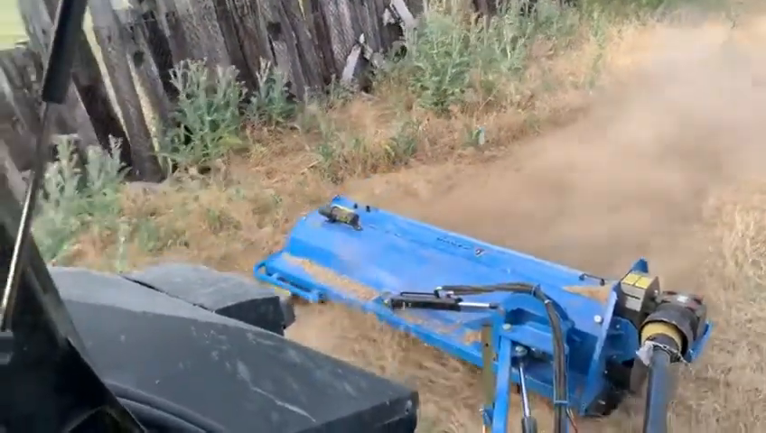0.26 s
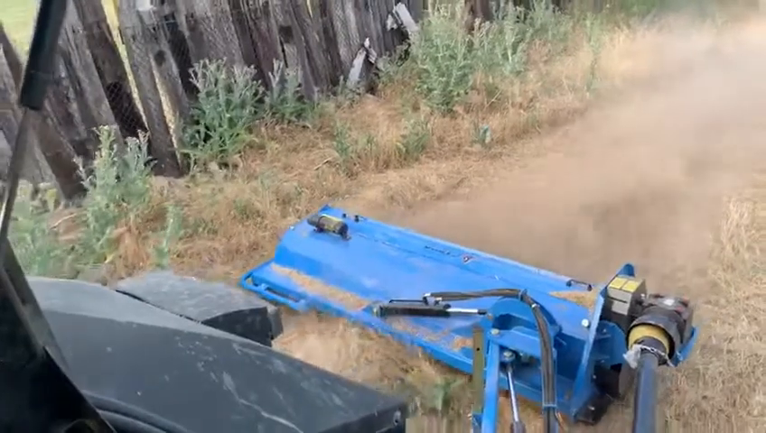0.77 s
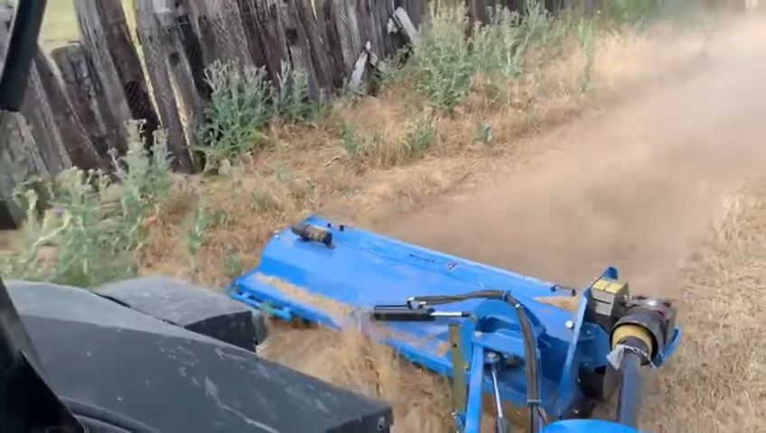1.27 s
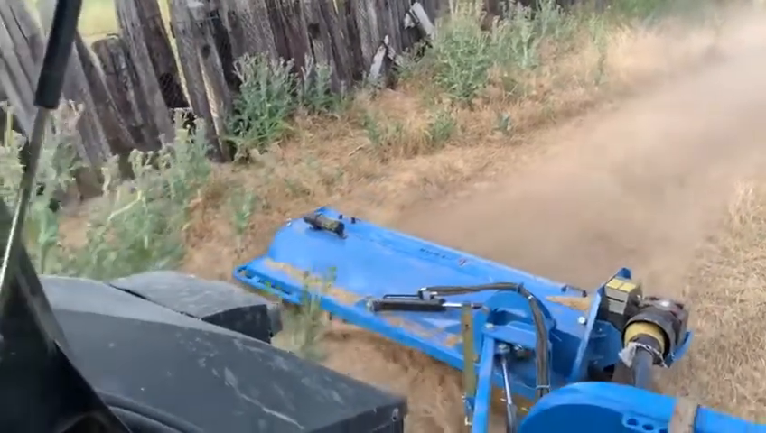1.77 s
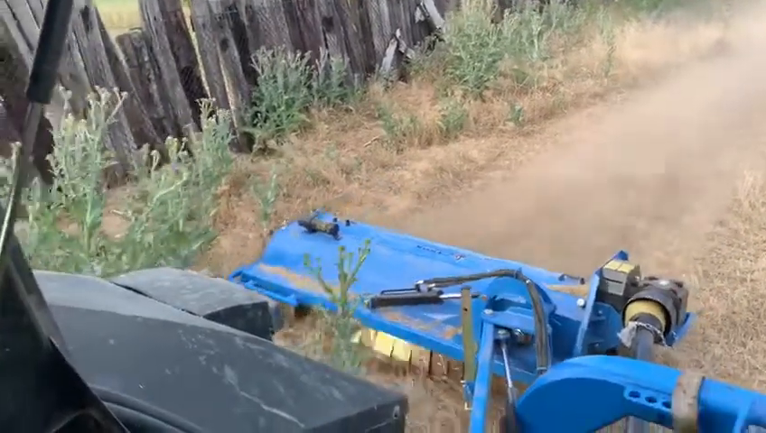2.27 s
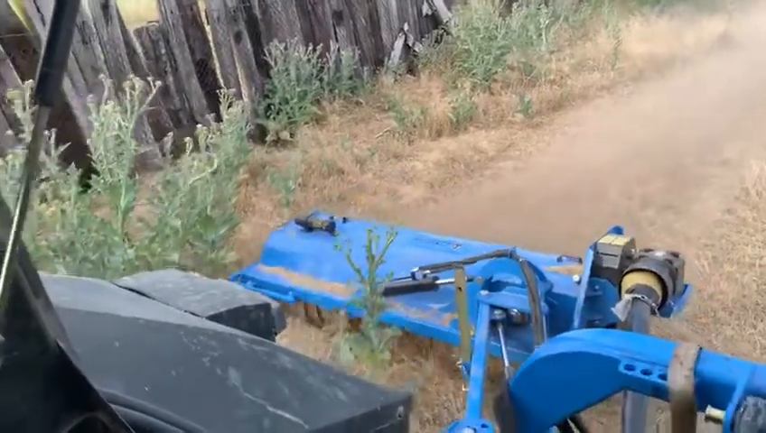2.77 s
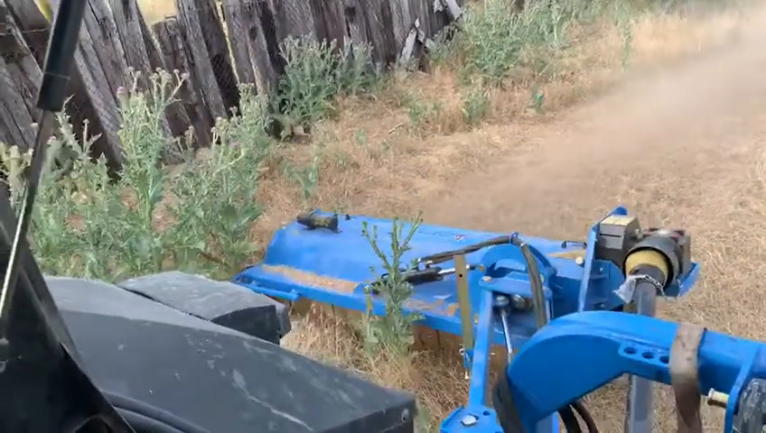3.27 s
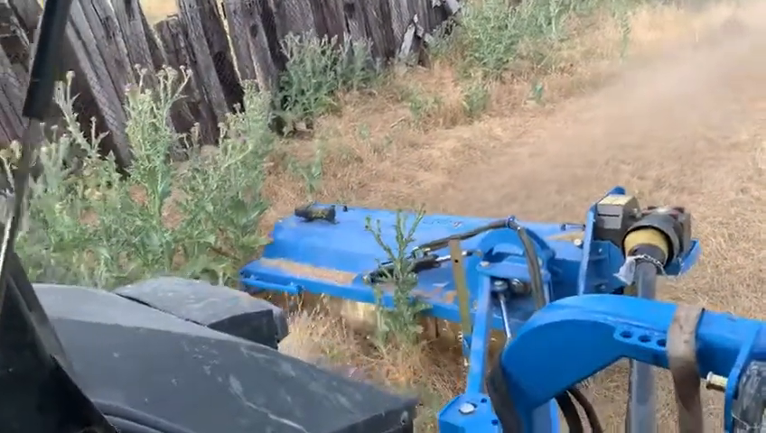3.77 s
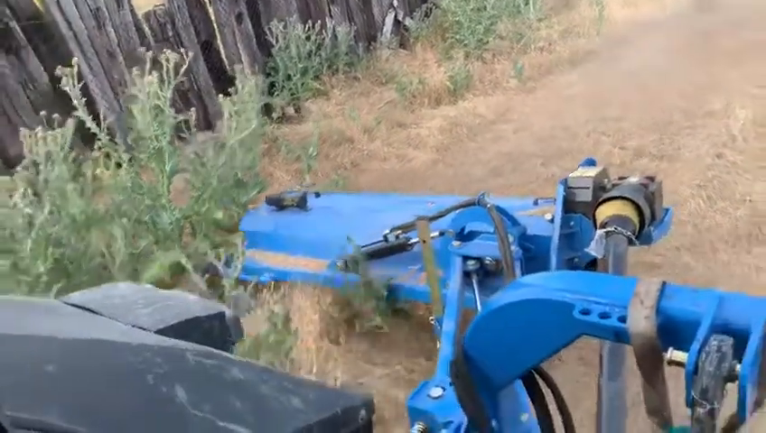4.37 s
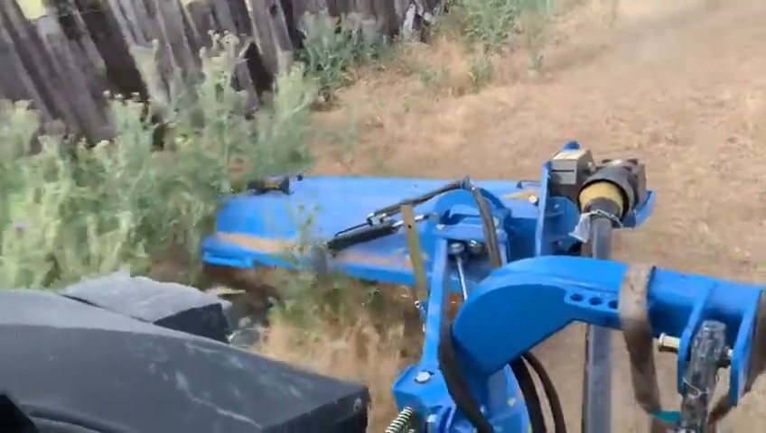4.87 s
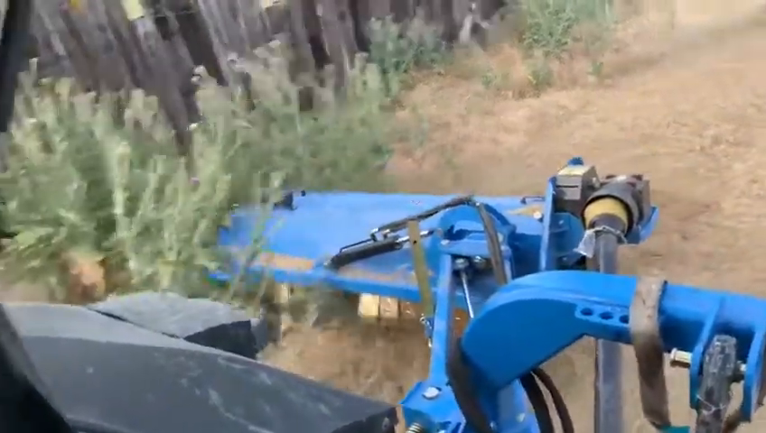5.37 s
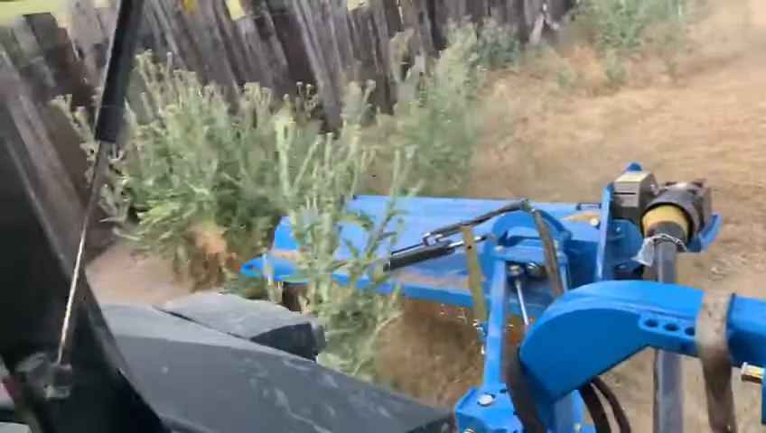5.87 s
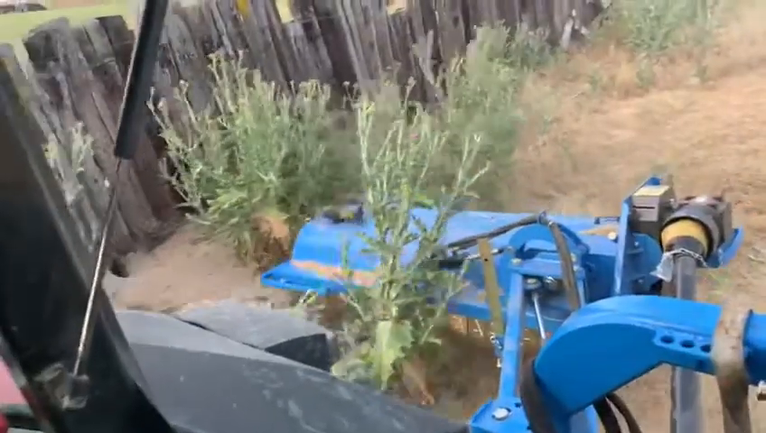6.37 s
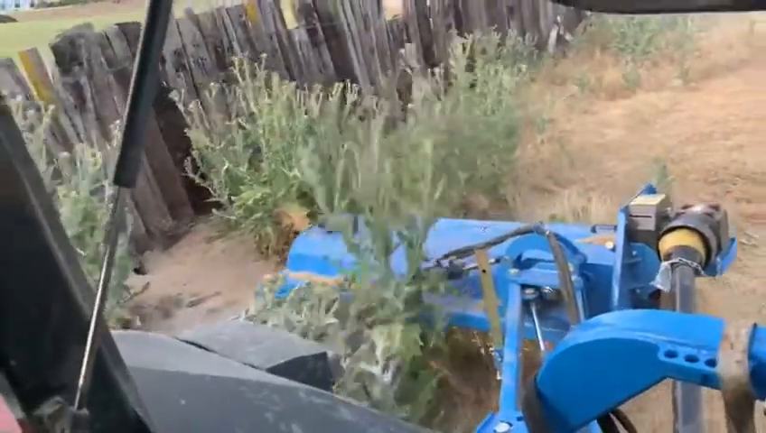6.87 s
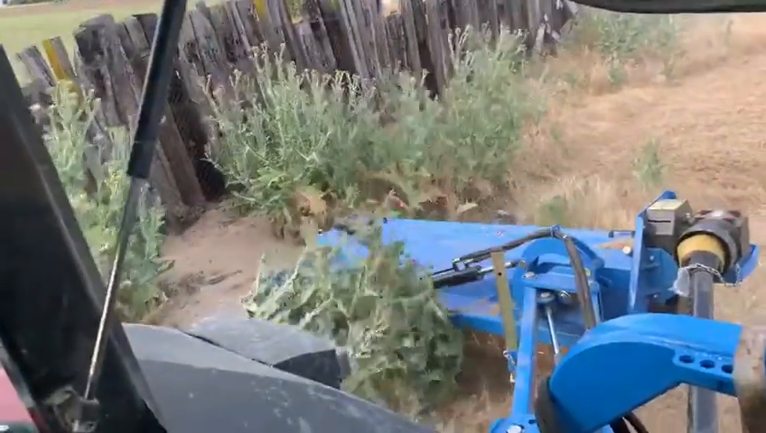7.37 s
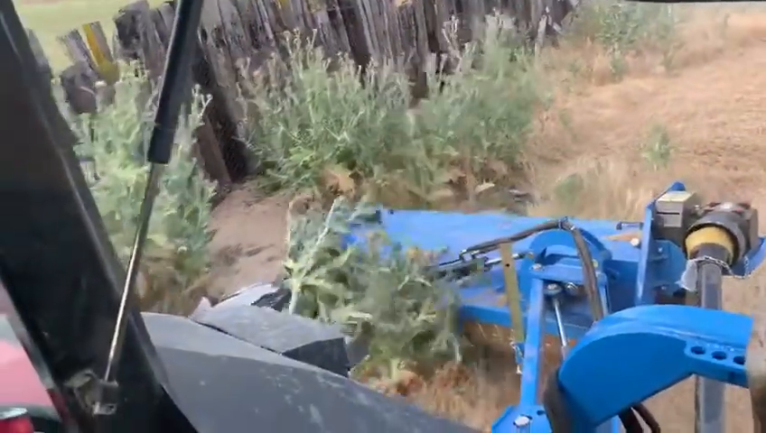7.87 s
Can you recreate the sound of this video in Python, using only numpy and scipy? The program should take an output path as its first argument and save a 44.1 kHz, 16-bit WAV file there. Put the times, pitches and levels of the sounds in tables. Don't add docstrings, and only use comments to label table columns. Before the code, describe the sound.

Close at an open tractor cab, a throbbing engine drones under shifting hydraulic whine as dry stalks crackle, snap and finally burst into dense shredding.

```python
import sys
import numpy as np
from scipy import signal
from scipy.fft import rfft, irfft, next_fast_len
from scipy.io import wavfile
from scipy.ndimage import uniform_filter1d

SR = 44100
rng = np.random.default_rng(int(sys.argv[2]) if len(sys.argv) > 2 else 0)


def boost_factor(decibels):
    exponent = np.asarray(decibels, float) / 20
    return 10 ** exponent


def log_audio(samples):
    frames = np.atleast_2d(samples).T
    limited = np.clip(frames, -1, 1)
    pcm = np.round(limited * 32767).astype(np.int16)
    wavfile.write(sys.argv[1], SR, pcm)


N = 357643
TIME = np.arange(N) / SR
STEP = 32
SIZE = next_fast_len(N)
HZ = np.arange(SIZE // 2 + 1) * SR / SIZE + 1e-3

CYCLE_HZ, ROTOR_HZ, PUMP_HZ = 12.875, 36.27, 327.1
LAG_S = 0.00016

# time_s, speed [share of working speed]
SHAFT_SPEED = [(0, 1.001), (.6, 1.001), (1.1, .998), (1.7, 1.0037), (2.3, 1.0022), (3.2, 1.005),
               (3.65, 1.003), (3.87, .987), (4.1, .9777), (4.35, .972), (4.7, .989), (5.0, 1.0006),
               (5.9, .9986), (6.5, .9945), (7.1, .9963), (8.11, .996)]


def columns(table):
    s, *cols = np.transpose(table)
    return [np.interp(TIME, s, c) for c in cols]


def shape(points, hz=HZ):
    f, db = np.transpose(points)
    return np.interp(np.log(hz), np.log(f), db)


def unit(x):
    return x / np.sqrt(np.mean(x ** 2))


def walk(rate):
    count = len(TIME[::STEP])
    hold = int(SR / STEP / rate)
    held = np.repeat(rng.standard_normal(count // hold + 1), hold)
    slewed = uniform_filter1d(uniform_filter1d(held, hold), hold)
    return unit(slewed[:count])


def fine(slow):
    return np.interp(TIME, TIME[::STEP], slow).astype(np.float32)


def loaded(idle_db, gain_db):
    # time_s, load [share of full load]
    effort = [(0, 0.26), (.8, 0.16), (1.2, 0.082), (2.2, 0.0073), (2.65, 0.54), (3.0, 0.43), (3.4, 0.61),
              (3.8, 0.72), (4.1, 0.89), (4.6, 1.02), (5.2, 0.83), (5.45, 0.63), (5.8, 0.77), (6.4, 0.78),
              (7.0, 0.66), (7.93, 0.85), (7.97, 1.36), (8.11, 1.43)]
    return idle_db + gain_db * columns(effort)[0]


def swells(rows, rest_db, rise_share=1):
    t = TIME[::STEP]
    power = boost_factor(np.broadcast_to(rest_db, N)[::STEP]) ** 2
    for s, wide_s, db in rows:
        width_s = np.where(t < s, rise_share * wide_s, wide_s)
        power = power + boost_factor(db - 6 * ((t - s) / width_s) ** 2) ** 2
    return fine(10 * np.log10(power))


def ports(mid, other, lag_s):
    # pitch_hz, level_db
    side_db = [(60, -60), (110, -26), (200, -13.5), (350, -16), (630, 0.5), (1140, 0.5), (2060, 1.5),
               (3710, 1), (6700, 0), (12100, 0)]
    # pitch_hz, level_db
    lean_db = [(60, 2), (110, 2), (200, -3), (350, 1.5), (630, -4), (1140, 2.5), (2060, 0.7), (3710, -1),
               (6700, -2), (12100, -3)]
    late = 0.36 * np.sin(2 * np.pi * HZ * lag_s)
    tied = np.tanh(shape(lean_db) / 6) - 1j * late
    tied = tied / np.maximum(1, np.abs(tied))
    untied = np.sqrt(np.maximum(0, 1 - np.abs(tied) ** 2))
    return np.array([mid, boost_factor(shape(side_db)) * (tied * mid + untied * other)])


def bands(pair, edges_hz, gains_db, flicker_db, flicker_rate):
    out, octave = np.zeros((2, N), np.float32), np.log2(HZ)
    for lo, hz, hi, db in zip(edges_hz, edges_hz[1:], edges_hz[2:], gains_db):
        window = np.interp(octave, np.log2([lo, hz, hi]), [0, 1, 0])
        gain = fine(boost_factor(db[::STEP] + flicker_db * walk(flicker_rate)))
        out += gain * irfft((pair * window).astype(np.complex64), SIZE)[:, :N]
    return np.array([out[0] + out[1], out[0] - out[1]])


def tones(turns, orders, levels_db, wobble_db, wander, lag_s, lean_db, locked=False):
    out, hz = np.zeros((2, N), np.float32), turns[-1] / TIME[-1]
    for k, db in zip(orders, levels_db):
        start = rng.random()
        cycles = k * turns + fine((.75 if locked else start) + wander * walk(9))
        phase = (cycles - np.floor(cycles)).astype(np.float32) * float(2 * np.pi)
        lag = float(np.pi * k * hz * lag_s)
        lean = lean_db * min(1., k * hz / 1000) ** 2 / 2
        gain = fine(np.sqrt(2) * boost_factor(np.broadcast_to(db, N)[::STEP] + wobble_db * walk(7)))
        out[0] += gain * float(boost_factor(lean)) * np.sin(phase - lag)
        out[1] += gain * float(boost_factor(-lean)) * np.sin(phase + lag)
    return out


def ring(s, hz, db, t60):
    out, first = np.zeros(N), int(s * SR) + 1
    t = TIME[first:first + SR // 4] - s
    out[first:first + len(t)] = boost_factor(db - 60 * t / t60) * (np.sin(2 * np.pi * hz * t) if hz else 1)
    return out


def roar(turns):
    # pitch_hz, level_db [per Hz]
    roar_db = [(15, -32), (25, -17), (75, -3.5), (143, -2.5), (195, -13), (306, -4), (482, -12.5),
               (543, -14.5), (612, -16.5), (1010, -17.5), (1310, -20.5), (1970, -20.5), (3100, -32),
               (3750, -34.5), (7500, -45), (9750, -74), (16500, -120)]
    cycle = 2 * np.pi * CYCLE_HZ * turns
    push = 1 + 0.077 * np.cos(cycle) + 0.1 * np.cos(2 * cycle)
    push += 0.051 * np.cos(4 * cycle) + 0.016 * np.cos(6 * cycle)
    noise = rfft(push * rng.standard_normal((2, N)), SIZE) * boost_factor(shape(roar_db[:-2]))
    edges_hz = 20 * 2 ** np.arange(0, 9.6, .5)
    rumble = loaded(-31, 0.47)
    drum = loaded(-35.5, 5.8)
    clatter = loaded(-31, 4)
    gains = [rumble if hz < 170 else drum if hz < 480 else clatter for hz in edges_hz[1:]]
    scale = np.std(irfft(noise[0] * (HZ > 480), SIZE))
    return bands(ports(*noise, LAG_S), edges_hz, gains, flicker_db=1.4, flicker_rate=10) / scale


def gear_mesh(turns):
    mesh_hz = (542, 1061.8, 1098.2, 1134, 1238.8, 790.2, 921, 1035.2, 1204, 1600, 2417)
    # peak_s, width_s [6 dB down], level_db
    mesh_swells = [
        [(1.0, 0.91, -38.5), (2.9, 0.74, -39), (5.8, 0.4, -42), (6.6, 0.43, -44), (8.1, 0.26, -38)],
        [(.8, 0.64, -40), (3.0, .5, -44.5), (5.0, 0.31, -37), (5.8, 0.56, -39), (7.05, 0.18, -33)],
        [(3.3, .4, -43), (4.3, 0.36, -40), (5.8, 0.8, -37), (7.1, 0.4, -37), (7.9, .3, -38)],
        [(.9, .9, -40.5), (2.3, 0.4, -38), (3.8, 0.2, -43.5), (5.9, .5, -45)],
        [(2.3, .3, -42), (4.6, 0.54, -40), (5.9, 0.41, -38.5), (7.4, 0.43, -38)],
        [(1.2, 0.67, -44), (4.8, 0.74, -41.5), (7.1, 0.79, -41.5)],
        [(3.5, 0.82, -45), (6.4, 0.41, -41), (7.7, 0.51, -38.5)],
        [(2.6, 0.91, -44), (5.0, 0.26, -47), (6.0, 0.47, -37.5), (7.9, 0.56, -35.5)],
        [(2.9, .5, -41), (4.9, 0.89, -40.5), (6.3, 0.37, -38.5)],
        [(2.2, .8, -61), (3.4, .3, -43)],
        [(2.3, 0.34, -46.5), (4.6, .2, -52), (7.8, 0.37, -52)],
    ]
    mesh_rest_db = (-44.5, -53, -59, -49, -47, -50, -45.5, -52.5, -51.5, -51, -76)
    # pitch_hz, level_db
    sidebands = [(530.8, -49), (599.5, -52.5), (953.8, -45.5), (1008.5, -46), (1025.8, -46), (1129, -46.5),
                 (1275, -53.5), (1945, -44.5)]
    levels = map(swells, mesh_swells, mesh_rest_db)
    gears = tones(turns, mesh_hz, levels, wobble_db=1.8, wander=.04, lag_s=0, lean_db=3.5)
    gears += tones(turns, *np.transpose(sidebands), wobble_db=4.1, wander=.05, lag_s=.00006, lean_db=1.0)
    return gears


def pump_song(turns):
    piston_orders = (1, 2, 3, 6, 5)
    # peak_s, width_s [6 dB down], level_db
    piston_swells = [
        [(0, 0.41, -38), (1.35, 0.26, -30), (3.1, 0.6, -35.5), (4.9, 0.49, -34), (6.65, 0.25, -28.5)],
        [(.3, 1, -43), (4.4, 0.9, -37.5), (5.6, .6, -36), (6.8, 0.57, -33), (7.7, .6, -43)],
        [(.1, 0.47, -30.5), (.75, 0.38, -31), (1.3, 0.22, -31.5), (1.9, 0.06, -40), (2.6, .3, -41),
         (6.6, .6, -44), (7.8, .71, -41)],
        [(1.1, .62, -35), (3.0, .35, -50), (4.3, 0.93, -37.5), (5.8, 0.36, -41.5), (7.2, .5, -35),
         (8.1, .35, -41)],
        [(.3, .6, -42), (1.6, .6, -43), (2.8, .6, -43), (5.3, .8, -41), (6.6, .2, -45), (7.4, .2, -37),
         (7.98, .15, -30.5)],
    ]
    piston_rest_db = (-42.5, -48, -50, -47, -48)
    # peak_s, width_s [6 dB down], level_db
    whistles = [
        [(2.85, .15, -53), (3.46, .06, -43), (3.56, .05, -43.5), (3.65, .04, -49)],
        [(2.73, .05, -52)],
    ]
    # order [multiple of pump pitch], level_db
    weak = [(4, -54), (7, -56), (8, -59), (9, -57), (10, -62), (11, -64), (12, -68)]
    shaft = PUMP_HZ * turns
    levels = map(swells, piston_swells, piston_rest_db)
    pump = tones(shaft, piston_orders, levels, wobble_db=1.3, wander=.04, lag_s=.00024, lean_db=1.5)
    levels = map(swells, whistles, (-57, -73))
    pump += tones(shaft, (13.98, 13.7), levels, wobble_db=2, wander=.05, lag_s=LAG_S, lean_db=0)
    pump += tones(shaft, *np.transpose(weak), wobble_db=2.5, wander=0.05, lag_s=LAG_S, lean_db=0)
    return pump


def engine_firing(turns):
    # order [multiple of engine cycle], level_db
    weak = [(5, -62), (8, -41), (9, -38.5), (10, -45), (12, -36.5), (15, -40.5), (18, -39), (20, -41.5),
            (23, -48), (27.5, -45.5), (29.5, -40.5), (35, -55.5), (55, -50)]
    shaft = CYCLE_HZ * turns
    second = loaded(-31.5, 2.5)
    speed_lost_percent = 100 * (1 - columns(SHAFT_SPEED)[0])
    third = loaded(-31, 4.9) + 1.5 * speed_lost_percent
    engine = tones(shaft, (4, 6), (second, third), wobble_db=.8, wander=.02, lag_s=.00028, lean_db=0,
                   locked=True)
    engine += tones(shaft, *np.transpose(weak), wobble_db=1.9, wander=0.059, lag_s=0.00018, lean_db=0,
                    locked=True)
    return engine


def rotor_hum(turns):
    row_orders = (4, 8, 40, 49.68, 12, 39)
    # peak_s, width_s [6 dB down], level_db
    row_swells = [
        [(.4, 1.0, -23), (2.0, 0.25, -29), (3.15, 0.6, -35), (4.6, 0, -36), (7.7, 1.5, -36.5)],
        [(.5, 0.84, -31.5), (3.4, 0.5, -27.5), (4.3, 0.75, -29.5), (6.7, 0.15, -36), (7.6, -1.5, -37)],
        [(1.5, 0.3, -37), (2.1, 0.5, -43), (2.65, 0.46, -35.5), (3.4, 1.5, -43)],
        [(2.25, 0.3, -34.5), (3.45, 0.5, -37.5)],
        [(4.3, 0.3, -35.5), (5.4, 0.4, -37), (6.0, 1.1, -41), (7.6, 1, -38.5)],
        [(1.25, -0.2, -36), (2.6, 3, -45.5)],
    ]
    row_rest_db = (-38, -40, -50, -58, -50, -53)
    # order [multiple of rotor turn], level_db
    weak = [(1, -52), (2, -43.5), (3, -34), (6, -42), (7, -48.5), (41, -44.5), (43, -43.5)]
    shaft = ROTOR_HZ * turns
    levels = map(swells, row_swells, row_rest_db)
    rotor = tones(shaft, row_orders, levels, wobble_db=1.66, wander=0.024, lag_s=0.00012, lean_db=0)
    rotor += tones(shaft, *np.transpose(weak), wobble_db=1.9, wander=0.06, lag_s=0.00019, lean_db=0)
    return rotor


def snaps():
    # start_s, peak_db, pitch_hz, t60_s
    snap_events = [(1.1323, -23.5, 6040, 0.036), (1.1424, -33, 3500, 0.03), (1.1564, -27, 5900, 0.021),
                   (1.21, -24, 6040, 0.034), (1.2194, -24, 5880, 0.017), (4.372, -28, 2890, .025),
                   (4.4732, -23.5, 2880, .025), (4.8029, -31, 2650, .025), (5.657, -22, 1930, .03),
                   (5.723, -20.5, 5250, 0.022), (4.6573, -26, 2940, 0.027), (4.84, -22, 1930, .025),
                   (4.9257, -28.5, 3670, .025), (5.1507, -28, 3850, 0.032), (5.3662, -30, 2570, .02),
                   (5.3916, -16.5, 2520, 0.043), (5.461, -19, 2870, 0.047), (5.469, -20, 3600, .04),
                   (5.61, -22, 3280, 0.032), (5.7698, -26, 3820, .025), (5.94, -14, 3330, 0.054),
                   (5.9415, -20, 4500, .03), (6.1481, -27, 1640, .03), (6.8386, -32, 1950, 0.032),
                   (7.5968, -25, 1620, 0.028), (7.928, -26, 1970, .03), (6.0601, -26, 3000, 0.033),
                   (6.4103, -20, 3520, 0.031), (6.4994, -27, 3220, 0.03), (6.7306, -31.5, 3270, 0.03),
                   (7.4744, -31, 2890, 0.027), (7.9558, -15.5, 1610, 0.06), (8.002, -15, 4100, .03)]
    rings, puffs = np.zeros(N), np.zeros(N)
    splinter_band = signal.butter(2, [1800, 5500], "bandpass", fs=SR, output="sos")
    splinters = signal.sosfilt(splinter_band, rng.standard_normal((2, N)))
    for s, db, hz, t60 in snap_events:
        chink = hz > 5000
        rings += ring(s, hz, db - (4 if chink else 6), (1.8 if chink else 1) * t60)
        puffs += ring(s, 0, db - (14 if chink else -2.5), 0.61 * t60)
    return rings + puffs * splinters


def stone_on_hood():
    # pitch_hz, level_db, t60_s
    hood_modes = [(135, -7, .12), (225, -13, .04), (266, -.5, .13), (335, -8, .04), (390, -7, .07),
                  (550, -5, .08), (680, -.5, .022), (1100, -2.5, .016), (1900, -12, .012),
                  (2800, -13, .012)]
    rings = np.zeros(N)
    for hz, db, t60 in hood_modes:
        arrives_s = 6.4125 + .0009 * np.sqrt(1000 / hz)
        sign = -1 if 200 < hz < 450 else 1
        rings += sign * ring(arrives_s, hz, db - 7.5, t60)
    return rings


def shredding(turns):
    # pitch_hz, level_db [per Hz]
    stalk_db = [(500, -4), (1000, 5.5), (1700, 3), (2500, -1.5), (3500, -3.5), (5000, -6), (7500, -6)]
    # time_s, level_db
    feed = [(0, -36), (.5, -38.5), (1.25, -39), (2.5, -40), (3.3, -43.5), (4.3, -45.5), (4.5, -42),
            (5.3, -39.5), (5.7, -34), (6.15, -39.5), (7.0, -38.5), (7.55, -43), (7.85, -39.5), (8.11, -30)]
    # peak_s, width_s [6 dB down], level_db
    clumps = [(1.18, 0.56, -39), (4.7, 0.1, -40), (4.845, .03, -40.5), (4.97, -0.05, -35),
              (5.025, .05, -31.5), (5.1, -0.05, -34.5), (5.15, -0.04, -30), (5.395, -0.03, -30),
              (5.43, 0.14, -35.5), (5.468, 0.07, -32.5), (5.56, 0.2, -44), (5.61, 0.05, -33),
              (5.7, .04, -36.5), (5.77, 0.03, -34), (5.942, 0.03, -34), (6.06, .03, -36.5),
              (6.345, 0.3, -49), (6.412, -0.02, -32), (6.5, 0.02, -35), (6.68, .1, -42), (6.84, .03, -41),
              (6.97, 0, -41), (7.195, .1, -44), (7.36, 0.05, -36), (7.65, 0.15, -41), (7.93, -0.05, -38),
              (7.965, 0.03, -28.5), (8.005, -0.02, -25.5), (8.045, 0, -29), (8.09, 0.02, -31.5)]
    rows = 1 + .03 * np.cos(2 * np.pi * ROTOR_HZ * turns)
    cracks = (rng.random(N) < 2500 / SR) * boost_factor(2.0 * rng.exponential(size=N))
    crackle = 1 + .4 * unit(uniform_filter1d(cracks, 30))
    grit = rows * fine(boost_factor(1.1 * walk(35))) * crackle
    noise = rfft(grit * rng.standard_normal((2, N)), SIZE) * boost_factor(shape(stalk_db))
    edges_hz = 300 * 2 ** np.arange(0, 6.1, .4)
    scale = np.std(irfft(noise[0] * (HZ > 3000) * (HZ < 7500), SIZE))
    gust_db = swells(clumps, columns(feed)[0], rise_share=0.37) - 1.5
    pair = ports(*noise, lag_s=0.0003)
    return bands(pair, edges_hz, [gust_db] * len(edges_hz), flicker_db=1.34, flicker_rate=24) / scale


def scene():
    turns = np.cumsum(columns(SHAFT_SPEED)[0]) / SR
    driveline = gear_mesh(turns) + pump_song(turns) + engine_firing(turns) + rotor_hum(turns)
    return roar(turns) + driveline + snaps() + stone_on_hood() + shredding(turns)


def valleys(dips):
    return sum(db * np.exp(-((HZ - hz) / wide) ** 2) for hz, wide, db in dips)


def patches(frames, lines, tall, wide):
    tiles = rng.standard_normal((2, frames // tall + 1, lines // wide))
    return np.kron(tiles, np.ones((1, tall, wide)))[:, :frames]


def thin(pair, patchy_db=4.5, mottle_db=5):
    # pitch_hz, level_db
    step_db = [(200, -22), (500, -16), (1000, -10), (2200, -3.5), (3200, -1), (5000, -2), (7500, 0),
               (11000, -2)]
    hop, lead = 1024, 1814
    window = signal.windows.kaiser_bessel_derived(2 * hop, 4 * np.pi)
    at = np.arange(2 * hop)[:, None] + .5 + hop / 2
    line = np.arange(hop) + .5
    waves = window[:, None] * np.sqrt(2 / hop) * np.cos(np.pi / hop * at * line)
    blocks = np.pad(pair, ((0, 0), (lead, 2 * hop - (lead + N) % hop))).reshape(2, -1, hop)
    lines = blocks[:, :-1] @ waves[:hop] + blocks[:, 1:] @ waves[hop:]
    frames = lines.shape[1]
    mean = np.mean(lines ** 2, axis=0)
    mean = uniform_filter1d(uniform_filter1d(mean, size=24, axis=1), size=3, axis=0)

    mottle = patches(frames, hop, 4, 4)
    weak = np.clip(2 - lines ** 2 / (4 * mean + 1e-20), 0, 1) * np.clip(line / 110, 0, 1)
    lines = lines * boost_factor(mottle_db * weak * (np.minimum(mottle, .5) + .02))

    coarse_db = shape(step_db, line * SR / 2 / hop) + patchy_db * patches(frames, hop, 2, 8)
    step = np.sqrt(np.abs(mean) + 1e-20) * boost_factor(coarse_db)
    lines = np.sign(lines) * step * np.floor((np.abs(lines) / step) ** .75 + .4) ** (4 / 3)
    out = np.zeros_like(blocks)
    out[:, :-1] += lines @ waves[:hop].T
    out[:, 1:] += lines @ waves[hop:].T
    return out.reshape(2, -1)[:, lead:lead + N]


def top_cut(x):
    return signal.sosfilt(signal.butter(12, 12670, fs=SR, output="sos"), x)


def record(dry):
    # pitch_hz, level_db
    mid_top = [(2000, -0.5), (2800, 0.5), (3800, 1.5), (5300, -1), (6600, 0), (7500, -0.5), (7750, -16.5),
               (8100, -14), (8500, -39), (9100, -16), (9400, -5), (9700, -0.5), (11200, 4), (11750, -7),
               (12000, -38), (12300, -62)]
    # pitch_hz, level_db
    side_top = [(2000, -2), (3000, 0.5), (4000, -1.5), (5300, 0.5), (6100, -1), (6600, -15), (7200, -5),
                (8100, 3.5), (9300, 2.5), (9900, -2.5), (10500, -18), (12300, -52)]
    # pitch_hz, width_hz, depth_db
    mid_dips = [(509, 23, -1.5), (610, 24, -0.5), (855, 26, -3), (1155, 34, 1.5), (1325, 46, -4),
                (1512, 24, -4), (1740, 41, -3), (1848, 27, -8), (2206, 69, -3), (2490, 55, -4),
                (2780, 36, -7), (3108, 78, -6), (3615, 57, -4), (4080, 61, -3.5), (4700, 70, -4),
                (5120, 90, -3.5), (5650, 68, -7), (6340, 90, -1.5), (7240, 110, -4)]
    # pitch_hz, width_hz, depth_db
    side_dips = [(760, 97, -5), (1110, 49, -2), (1330, 60, -4), (2260, 70, -2), (2520, 100, -9),
                 (2740, 60, -5), (3130, 90, -6), (3650, 150, -6), (3960, 100, -5), (4250, 120, -9),
                 (4650, 100, -3), (4960, 100, -6), (5700, 120, -5)]
    mid_gain = boost_factor(shape(mid_top) + valleys(mid_dips))
    side_gain = boost_factor(shape(side_top) + valleys(side_dips))
    mid = irfft(rfft(dry[0] + dry[1], SIZE) * mid_gain, SIZE)[:N] / 2
    side = irfft(rfft(dry[0] - dry[1], SIZE) * side_gain, SIZE)[:N] / 2
    mid, side = thin(np.array([mid, side]))
    return top_cut(np.array([mid + side, mid - side]))


dry = scene()
out = record(dry)
log_audio(out)
```